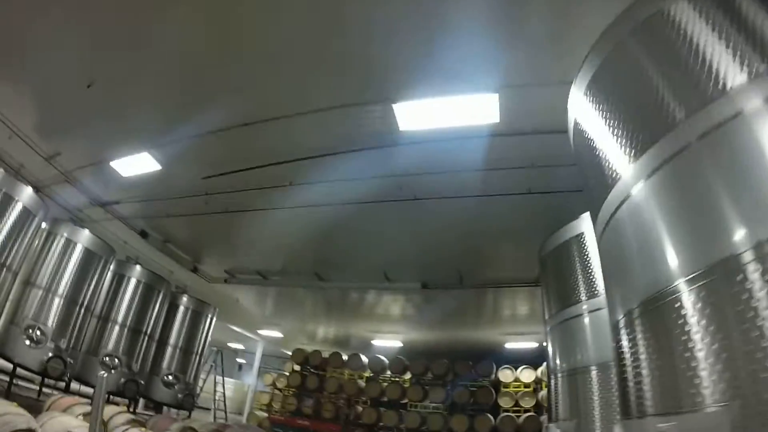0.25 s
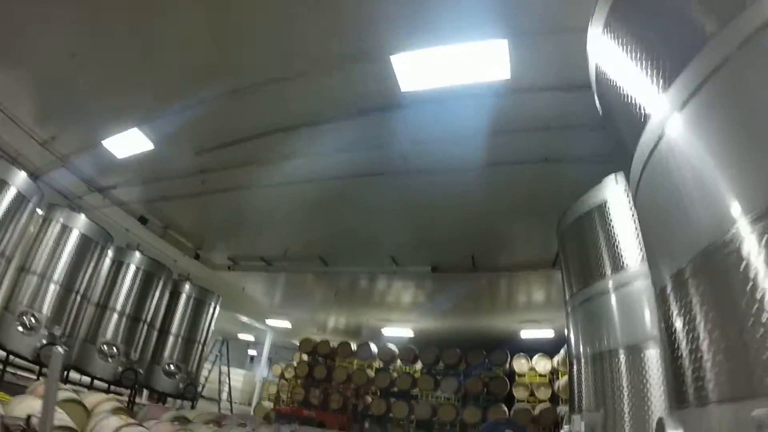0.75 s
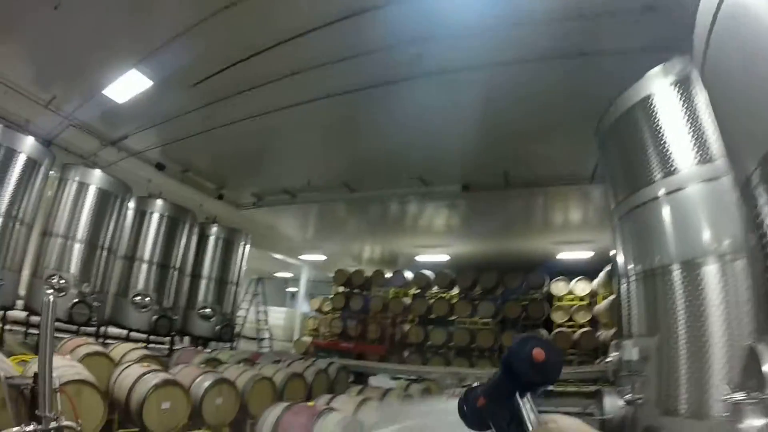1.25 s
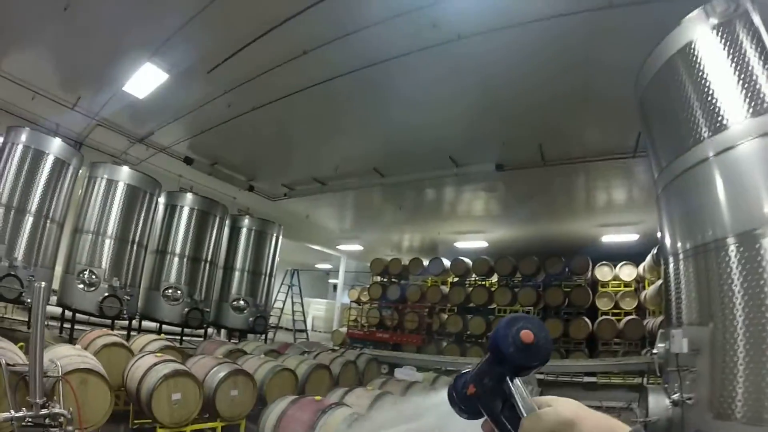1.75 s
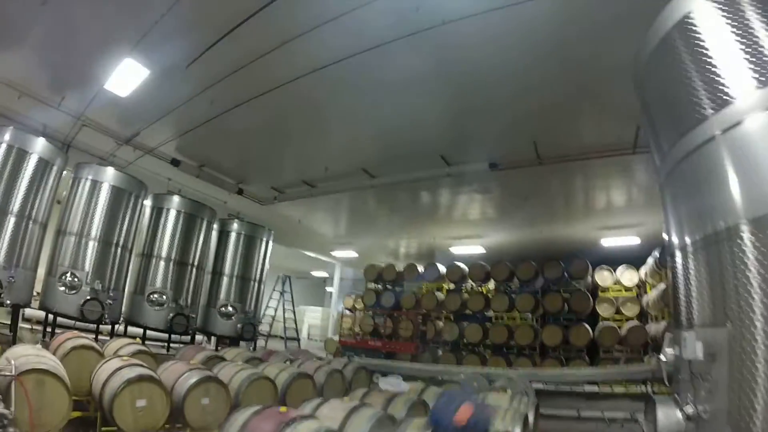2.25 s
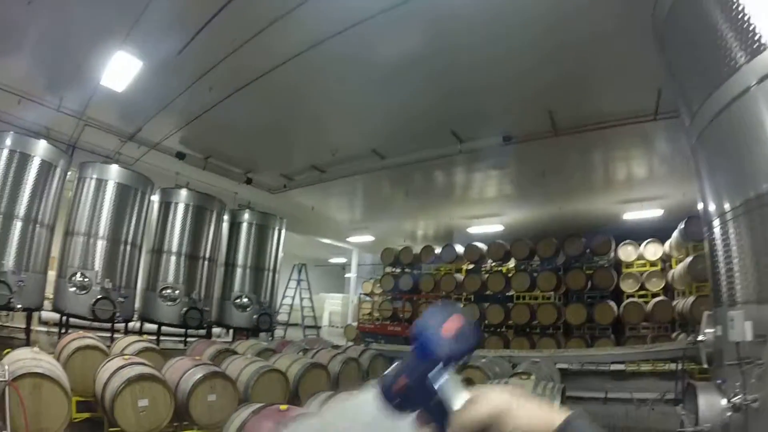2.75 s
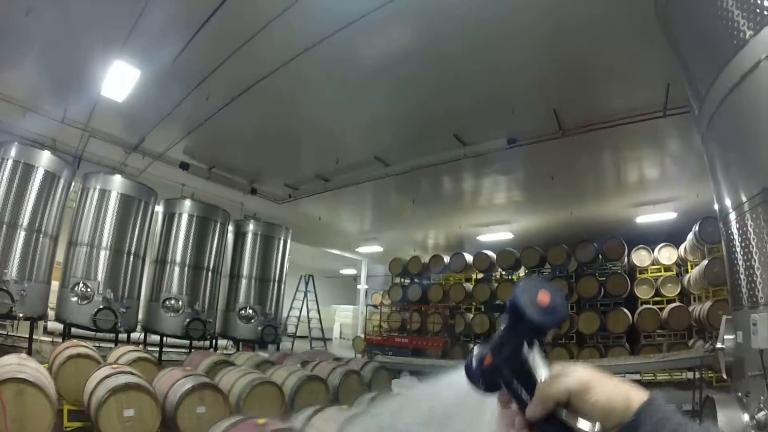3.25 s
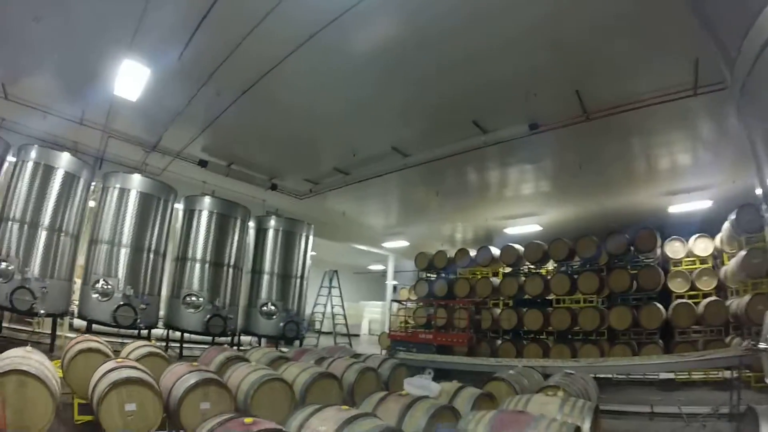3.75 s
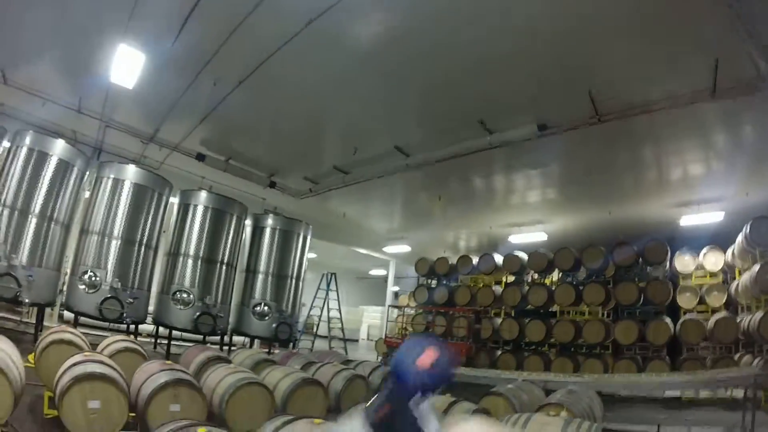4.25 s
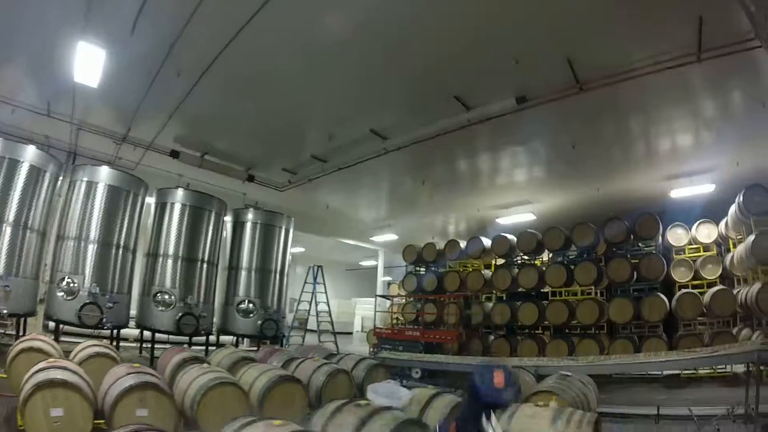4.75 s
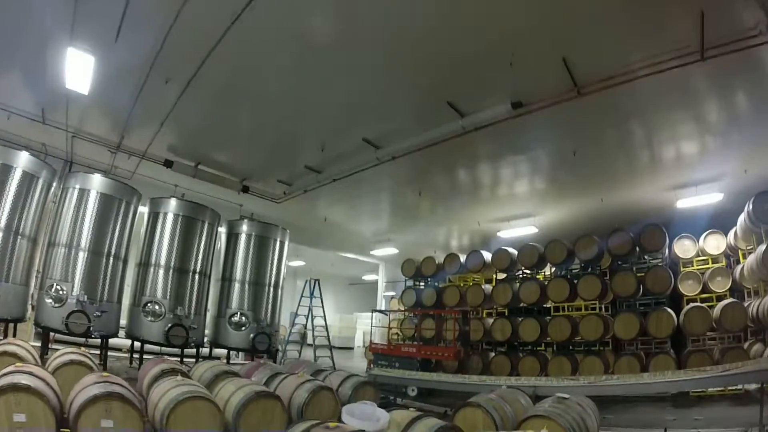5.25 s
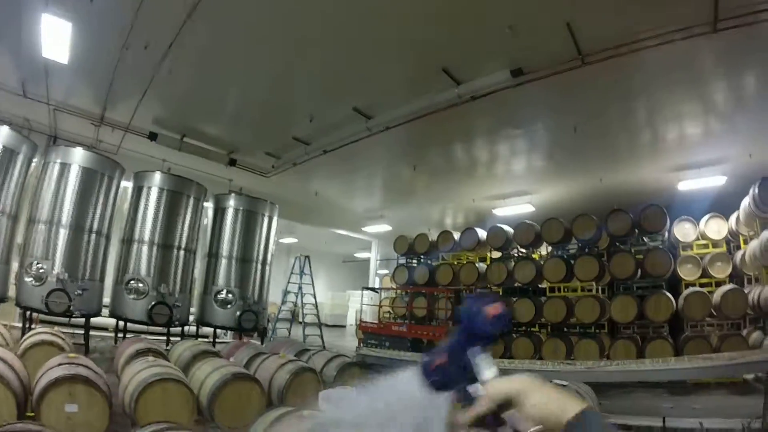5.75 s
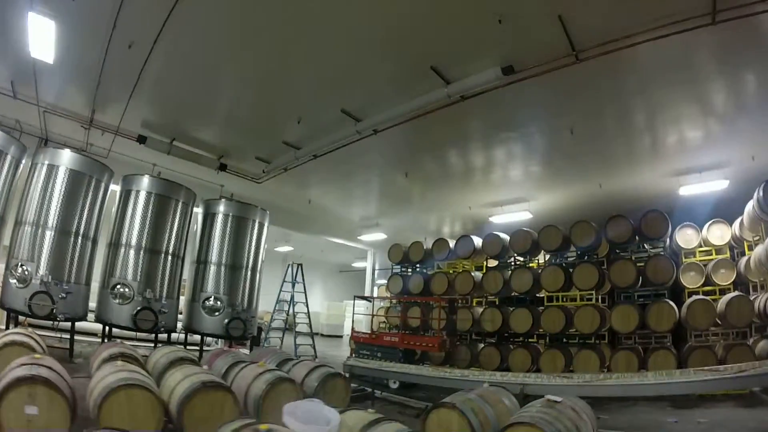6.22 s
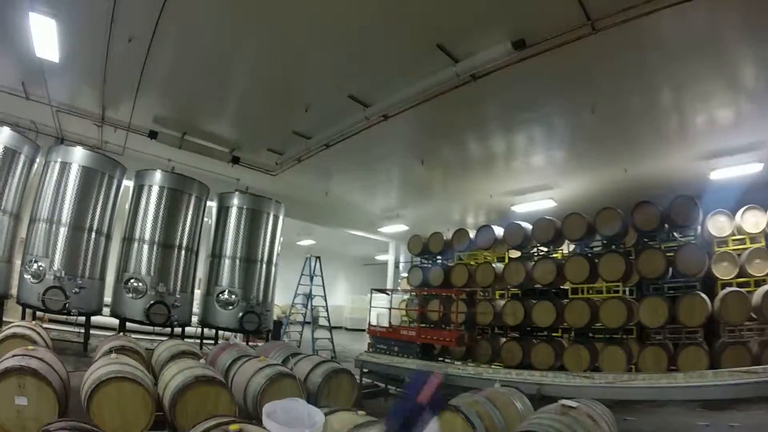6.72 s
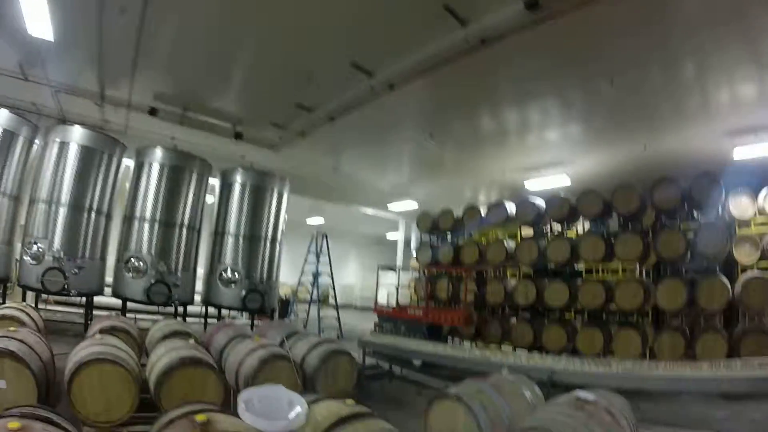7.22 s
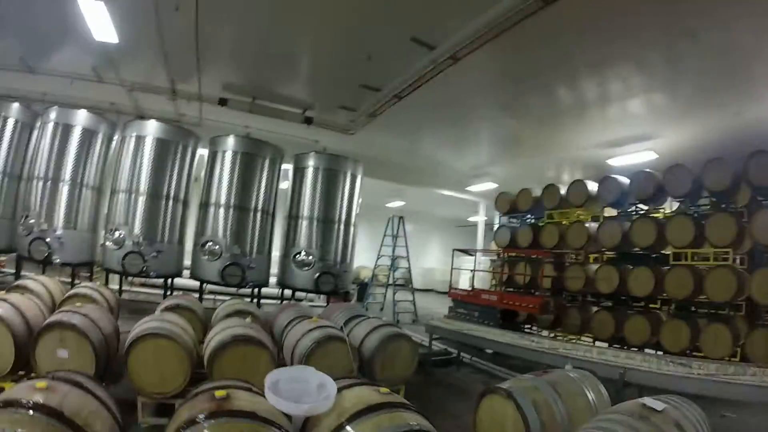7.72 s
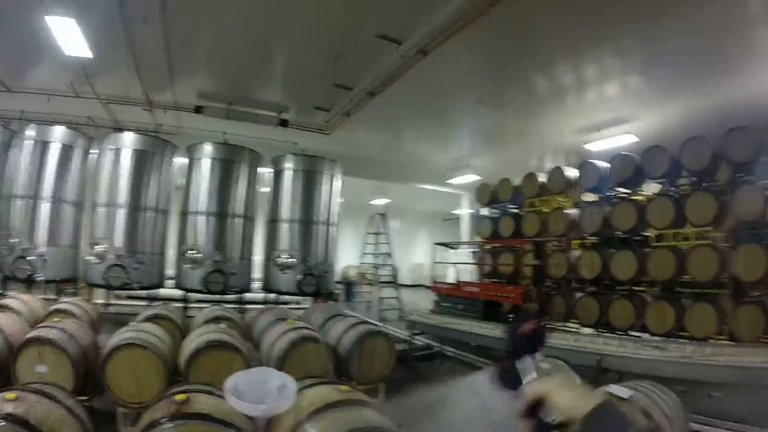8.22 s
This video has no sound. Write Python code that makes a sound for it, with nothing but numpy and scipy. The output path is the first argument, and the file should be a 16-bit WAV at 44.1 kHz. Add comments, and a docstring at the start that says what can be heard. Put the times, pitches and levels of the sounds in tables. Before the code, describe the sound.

A steady, bright hiss of water sprayed from a hose gun over barrels, boxy and muffled, with faint case ticks and soft knocks.

```python
"""A big cellar: a hand-held hose gun sprays a fan of water over oak barrels, heard inside a camera's closed case.
The hiss is noise plus droplet impacts, coloured by case resonances; it swells and changes colour as the gun sweeps.
The case ticks (short damped modes), and sways and thumps softly on its mount (subsonic noise, damped sines).
Ventilation murmurs underneath as steady low-pitched noise.
"""
import sys
import numpy as np
from scipy import signal
from scipy.fft import rfft, irfft
from scipy.io import wavfile
from scipy.ndimage import uniform_filter1d

SR = 44100
rng = np.random.default_rng(int(sys.argv[2]) if len(sys.argv) > 2 else 0)


def digitize_waveform(pressure):
    """Quantize a signal to 16-bit integers and store it at the path in sys.argv[1].

    Rows of a 2-D input are taken as channels; values are limited to [-1, 1].
    """
    field = np.atleast_2d(pressure).T
    bounded = np.clip(field, -1, 1)
    quanta = np.round(bounded * 32767).astype(np.int16)
    wavfile.write(sys.argv[1], SR, quanta)


N = 373968

# Broad colour of the spray through the case wall. Each row: frequency in Hz, relative level in dB.
SPRAY_COLOUR_HZ_DB = [(700, -22), (1250.0, -16.5), (1800.0, -7), (2350.0, -8.5), (2900.0, -3.0),
                      (3400.0, -0.8), (3900.0, 1.5), (4600.0, -1.0), (5200.0, -7.5), (6400.0, -6),
                      (7700.0, -16.5), (11400.0, -22), (13200.0, -23), (14600.0, -31)]
# Resonances and one notch of the case. Each row: centre in Hz, width in Hz, lift in dB.
CASE_MODES_HZ_HZ_DB = [(1506, 177, 6), (2120, 220, 5), (2596, 396, 7), (3138, 98, 4.5), (4410, 220, 5),
                       (4830, 51, -10), (4870, 87, 6), (5566, 250, 6.5), (6070, 360, 2.5), (8560, 350, 1.5),
                       (10230, 1170, 3.5), (12250, 450, 3)]
# Loudness of the spray over the barrels. Each row: time in seconds, relative hiss level in dB.
HISS_S_DB = [(0.0, -41.5), (0.09, -42), (0.82, -43.5), (1.39, -43.5), (1.58, -40.5), (2.36, -38),
             (2.5, -36.5), (3.8, -38.5), (4.72, -38), (4.96, -39), (5.97, -38), (6.04, -41), (7.27, -42.5),
             (7.44, -40.5), (7.82, -40.5), (7.93, -39.5), (7.98, -41), (8.48, -43.5)]
# Treble, where the fine mist hisses. Each row: time in seconds, relative level in dB.
MIST_S_DB = [(0.0, -61), (0.09, -63), (0.99, -59), (1.63, -57), (1.65, -59.5), (2.78, -59.5), (2.88, -58.5),
             (3.78, -59), (5.93, -57), (6.31, -60), (6.54, -56.5), (7.44, -59), (7.86, -55.5),
             (8.48, -60.5)]
# Lifts of the gun. Each row: start of rise in seconds, start of drop in seconds, height aimed for (0-1).
GUN_LIFTS = [(1.05, 2.08, 0.79), (2.6, 3.35, 1), (4.047, 4.715, 0.87), (5.498, 6.004, 0.57),
             (6.75, 7.2, 0.4), (7.58, 7.72, 0.3), (8.05, 8.45, 0.6)]
# Sharp ticks of the plastic case. Each row: start in seconds, peak in dB, low-pass cutoff in Hz.
TICKS_S_DB_HZ = [(0.604, -41, 950), (4.310, -37.5, 1300), (6.1203, -25, 2420), (7.175, -23.5, 2500),
                 (8.4736, -26.5, 2400)]
# Modes of a tick before the low-pass. Each row: frequency in Hz, relative level in dB, t60 in seconds.
TICK_MODES_HZ_DB_S = [(497, -36, 0.007), (897, -5, 0.036), (1613, 3.5, .014), (1870, 2, 0.011)]
# Soft knocks of the mount. Each row: start in seconds, peak in dB, pitch in Hz.
THUMPS_S_DB_HZ = [(0.401, -45.5, 140), (0.603, -49.5, 135), (0.79, -48.5, 146), (0.927, -41.5, 118),
                  (2.419, -32, 110), (2.496, -36, 103), (3.245, -45, 61.7), (4.235, -38.5, 104),
                  (4.305, -48, 134), (5.654, -37, 98), (6.121, -46.5, 145), (7.174, -47, 140),
                  (7.322, -45, 108)]
# Lurches on the mount. Each row: centre in seconds, length in seconds, relative rumble level in dB.
LURCHES_S_S_DB = [(.35, 0.18, -39), (0.935, .4, -40), (1.68, 0.5, -48.5), (2.36, 0.18, -40.5),
                  (3.27, 0.096, -48), (4.164, 0.2, -47), (5.605, 0.096, -42), (6.304, 0.1, -44),
                  (7.13, 0.19, -50), (8.32, 0.12, -51)]
# Ventilation and distant wash. Each row: frequency in Hz, relative density in dB per Hz.
CELLAR_COLOUR_HZ_DB = [(24, -34), (40, -4), (48, -1.5), (140, -6.5), (177, -8), (321, -11), (442, -12),
                       (497, -13.5), (804, -14.5), (890, -14.5), (1300, -16), (1690, -20), (2860, -120)]

RISE_S, DROP_S = 0.29, 0.28
# low / high: gun down / gun fully raised
ECHO_LOW_S, ECHO_HIGH_S = 0.34e-3, 0.47e-3
RIPPLE_LOW_DB, RIPPLE_HIGH_DB, RIPPLE_TOP_HZ = 1.5, 2, 4900
HISS_REF_DB, SPRAY_GAIN_DB = -40, 0.35
DRUM_HZ, DRUM_OCTAVES = 2000, 0.56
DRUM_DB, DRUM_DB_PER_DB, DRUM_HIGH_DB = -2, 0.52, 0.4
JET_HZ, JET_OCTAVES, JET_HIGH_DB = 4060, 0.2, 1.5
MIST_REF_DB, MIST_FROM_HZ = -57.3, 6000
SWAY_DB, RUMBLE_GAIN_DB = -59.5, 2.7  # the gain applies to sway and lurches alike
CELLAR_DB = -57
TOP_HZ = 15230


def spray():
    """Jet turbulence and droplet impacts, coloured by the case."""
    impacts = droplets(per_s=9000, spread_db=2)
    water = rng.standard_normal(N) + undb(-7.0) * impacts
    case_db = sum(db * bell(bins() - hz, width_hz) for hz, width_hz, db in CASE_MODES_HZ_HZ_DB)
    gain = undb(colour(SPRAY_COLOUR_HZ_DB) + case_db) * above(900, order=3)
    heard = irfft(rfft(water) * gain, N)
    flutter_db = 0.39 * walk(35)  # the jet flutters as it breaks up
    return aim(level(heard, flutter_db - 0.2))


def droplets(per_s, spread_db):
    """A dense rain of tiny impacts of unequal size, at rms 1."""
    hit = rng.random(N) < per_s / SR
    size = undb(spread_db * rng.standard_normal(N))
    return level(hit * rng.standard_normal(N) * size, 0)


def aim(water):
    """Sweep of the gun: drumming swells on the barrels, mist comes and goes, spectral ripples glide."""
    hz, s, slices = signal.stft(water, SR, nperseg=1024)
    hz = np.maximum(hz, 1)[:, None]
    hiss_db = np.interp(s, *np.transpose(HISS_S_DB))
    mist_level_db = np.interp(s, *np.transpose(MIST_S_DB))
    swell_db = hiss_db - HISS_REF_DB
    height = gun_height(s)

    # drumming grows with the hiss and the height of the gun
    drum_lift_db = DRUM_DB + DRUM_DB_PER_DB * swell_db + DRUM_HIGH_DB * height
    drum_db = drum_lift_db * bell(np.log2(hz / DRUM_HZ), DRUM_OCTAVES)
    # the jet is brightest when held high
    jet_db = JET_HIGH_DB * height * bell(np.log2(hz / JET_HZ), JET_OCTAVES)
    # in the treble the hiss swell cancels and the mist level takes over
    mist_db = (mist_level_db - MIST_REF_DB - swell_db) / (1 + (MIST_FROM_HZ / hz) ** 7)
    ripple_db = echo_ripple_db(hz, height)
    # ever-changing paths between wet floor, barrels and tanks make the hiss finely patchy
    patchy_db = 1.53 * patches(slices.shape, slices_count=12, bins_count=3)

    gain_db = SPRAY_GAIN_DB + hiss_db + drum_db + jet_db + mist_db + ripple_db + patchy_db
    return signal.istft(slices * undb(gain_db), SR)[1][:N]


def echo_ripple_db(hz, height):
    """Spectral ripple of a near reflection, later as the gun rises and weaker in the treble."""
    echo_s = np.interp(height, [0, 1], [ECHO_LOW_S, ECHO_HIGH_S])
    depth_db = np.interp(height, [0, 1], [RIPPLE_LOW_DB, RIPPLE_HIGH_DB])
    return depth_db * np.cos(2 * np.pi * hz * echo_s) / (1 + (hz / RIPPLE_TOP_HZ) ** 4)


def gun_height(s):
    """Height of the gun at the times s: each lift ramps up towards its height and down again."""
    height = np.zeros(len(s))
    for rise_s, drop_s, top in GUN_LIFTS:
        rising = np.clip((s - rise_s) / RISE_S, 0, 1)
        dropping = np.clip(1 - (s - drop_s) / DROP_S, 0, 1)
        height += top * rising * dropping
    return height


def patches(shape, slices_count, bins_count):
    """Smooth random unevenness over pitch and time; rms 1."""
    field = rng.standard_normal(shape)
    for _ in range(2):
        field = uniform_filter1d(field, bins_count, axis=0)
        field = uniform_filter1d(field, slices_count, axis=1)
    return level(field, 0)


def ticks():
    """The plastic case snaps under strain and rings for some milliseconds; gentle snaps are duller."""
    out, t = np.zeros(N), np.arange(SR // 20) / SR
    ring = sum(undb(db - 60 * t / t60_s) * np.sin(2 * np.pi * hz * t) for hz, db, t60_s in TICK_MODES_HZ_DB_S)
    for s, peak_db, cutoff_hz in TICKS_S_DB_HZ:
        lowpass = signal.butter(4, cutoff_hz, fs=SR, output="sos")
        tick = signal.sosfilt(lowpass, ring)
        add(out, s, undb(peak_db) * tick / np.abs(tick).max())
    return out


def mount():
    """The camera sways on its mount as subsonic noise and knocks against it as short damped sines."""
    now = np.arange(N) / SR
    lurches = sum(undb(db) * bell(now - s, length_s) for s, length_s, db in LURCHES_S_S_DB)
    rumble = level(noise(above(9.9, order=3) * below(18.5, order=4)), RUMBLE_GAIN_DB)
    out = (undb(SWAY_DB) + lurches) * rumble
    t = np.arange(SR // 6) / SR
    envelope = (1 - np.exp(-t / 0.0096)) ** 2 * np.exp(-t / 0.0069)
    for s, peak_db, hz in THUMPS_S_DB_HZ:
        knock = envelope * np.sin(2 * np.pi * hz * t)
        add(out, s, undb(peak_db) * knock / np.abs(knock).max())
    return out


def cellar():
    """Low wash of ventilation in the big room, with a slight random drift in level."""
    wash = noise(undb(colour(CELLAR_COLOUR_HZ_DB)) * below(1600, order=6) * above(41, order=3))
    return level(wash, CELLAR_DB + 0.79 * walk(4.96))


def undb(db):
    """Decibels to gain."""
    return 10 ** (np.asarray(db) / 20)


def level(x, db):
    """Normalize to rms 1, then apply a fixed or moving level."""
    return x * undb(db) / np.sqrt(np.mean(x ** 2))


def bins():
    """Spectrum frequencies in Hz, at least 1."""
    return np.maximum(np.arange(N // 2 + 1) * SR / N, 1)


def colour(points):
    """Interpolate a (Hz, dB) outline on a log-frequency axis."""
    hz, db = np.transpose(points)
    return np.interp(np.log(bins()), np.log(hz), db)


def noise(gain):
    """Gaussian noise with a given gain at each frequency."""
    return irfft(rfft(rng.standard_normal(N)) * gain, N)


def below(hz, order):
    """Gain of a low-pass slope."""
    return 1 / np.sqrt(1 + (bins() / hz) ** (2 * order))


def above(hz, order):
    """Gain of a high-pass slope."""
    return 1 / np.sqrt(1 + (hz / bins()) ** (2 * order))


def bell(offset, width):
    """A hump that falls to one half at half its width."""
    return 0.5 ** ((2 * offset / width) ** 2)


def walk(rate_hz):
    """Random levels held 1 / rate_hz seconds and smoothed twice; rms 1."""
    hold = int(SR / rate_hz)
    held = rng.standard_normal(N // 100)[np.arange(N) // hold]
    return level(uniform_filter1d(uniform_filter1d(held, hold), hold), 0)


def add(track, s, sound):
    """Mix a short sound in at a time in seconds."""
    i = int(s * SR)
    track[i:i + len(sound)] += sound[:N - i]


def scene():
    """Everything reaches one microphone inside the case; both channels are equal."""
    mono = spray() + ticks() + mount() + cellar()
    return np.array([mono, mono])


def record(dry):
    """The recorder cuts the top steeply."""
    return irfft(rfft(dry) * below(TOP_HZ, order=400), N)


dry = scene()
out = record(dry)
digitize_waveform(out)
```